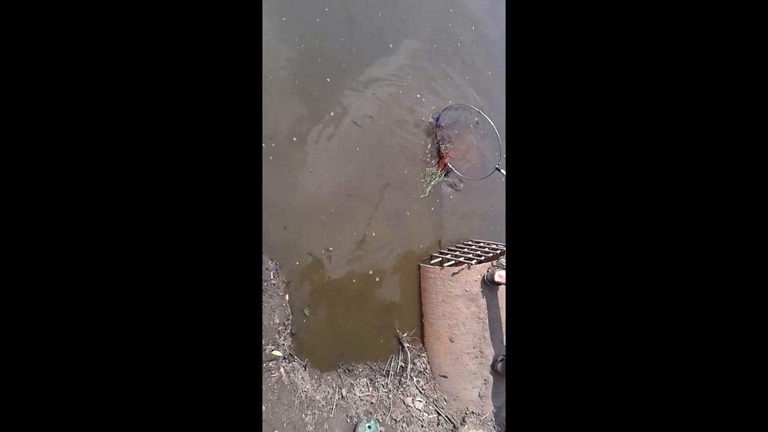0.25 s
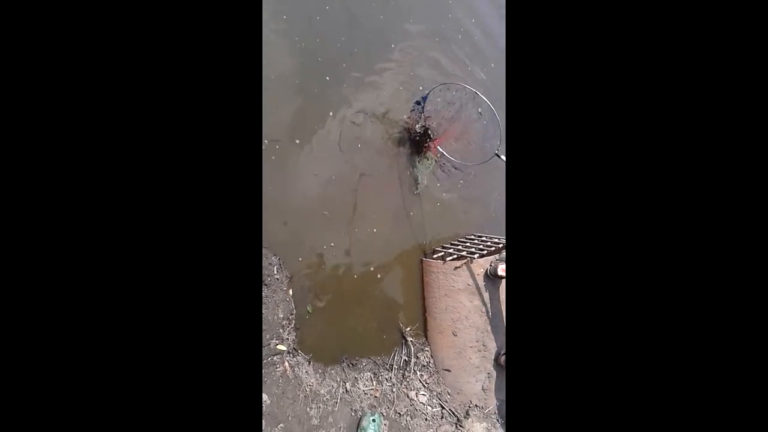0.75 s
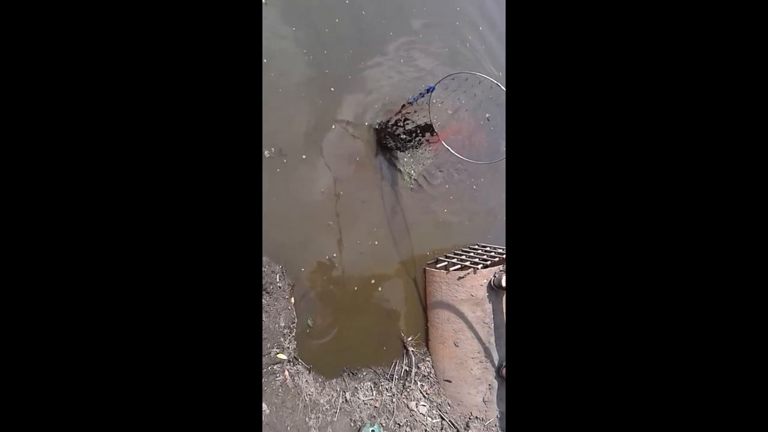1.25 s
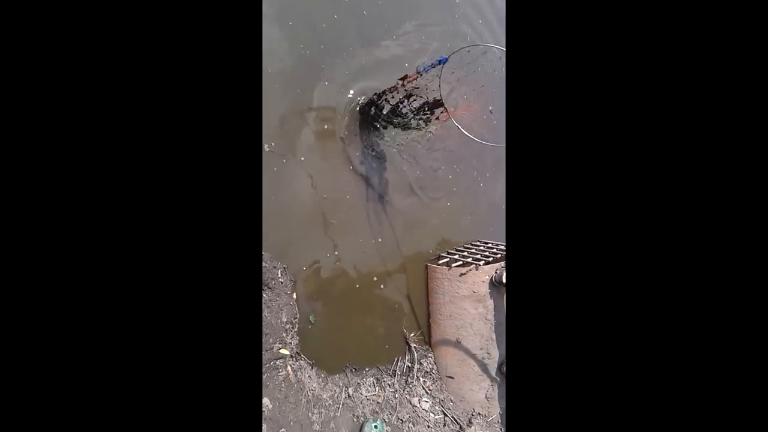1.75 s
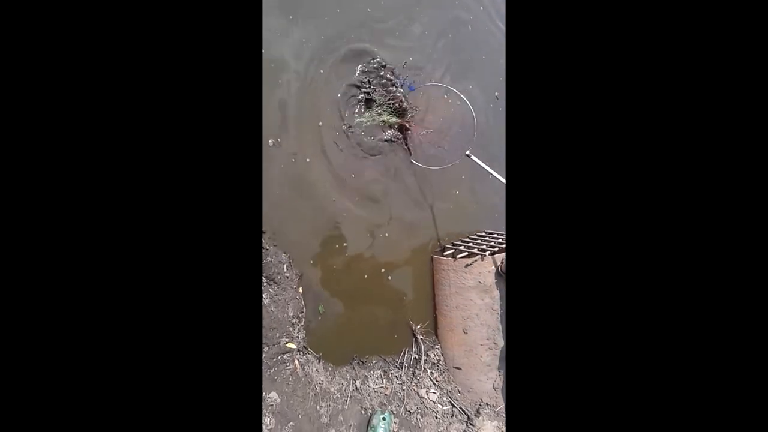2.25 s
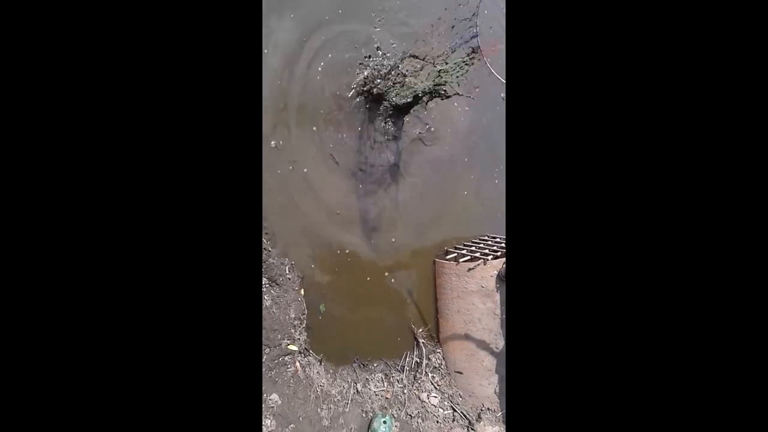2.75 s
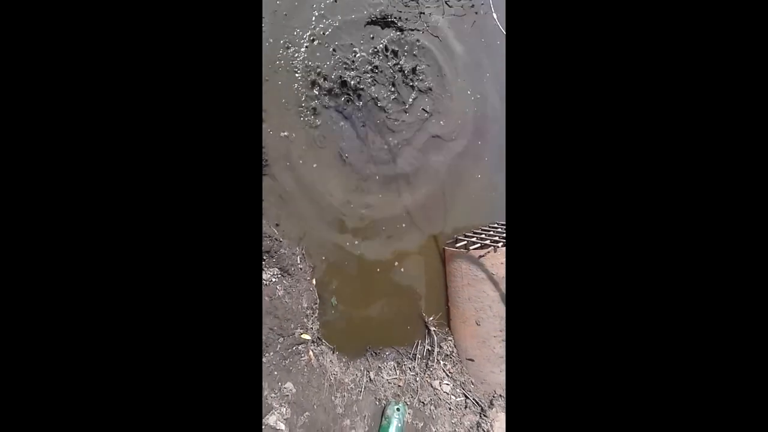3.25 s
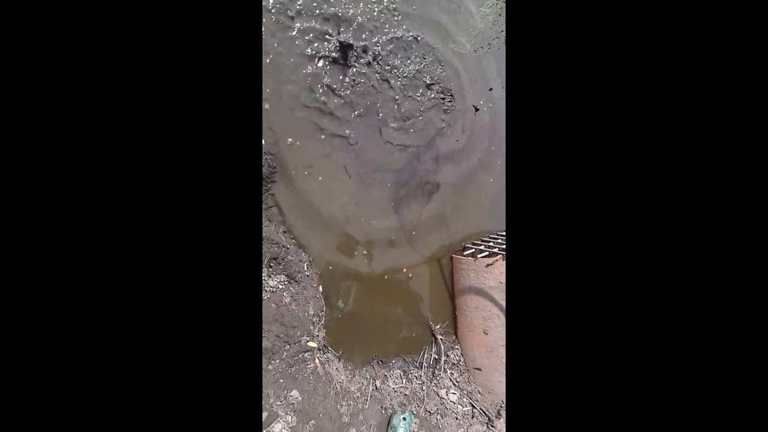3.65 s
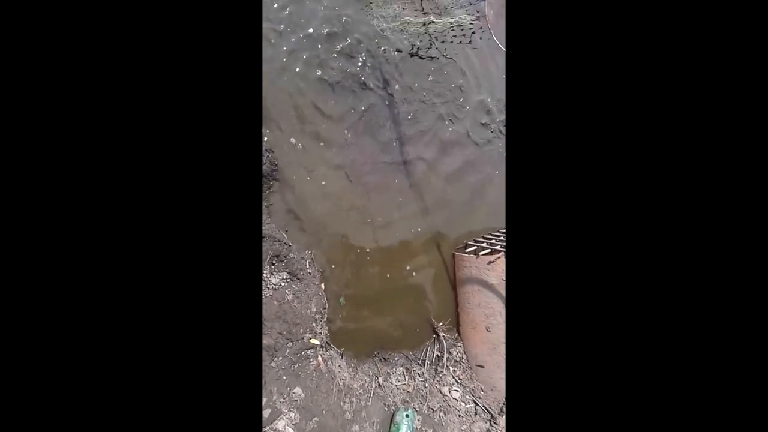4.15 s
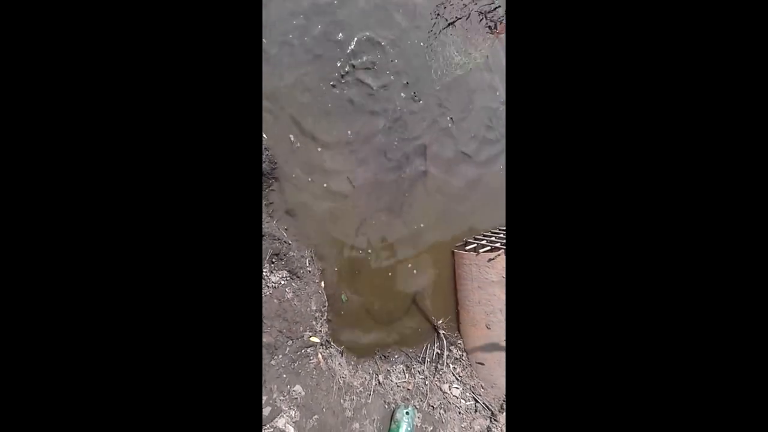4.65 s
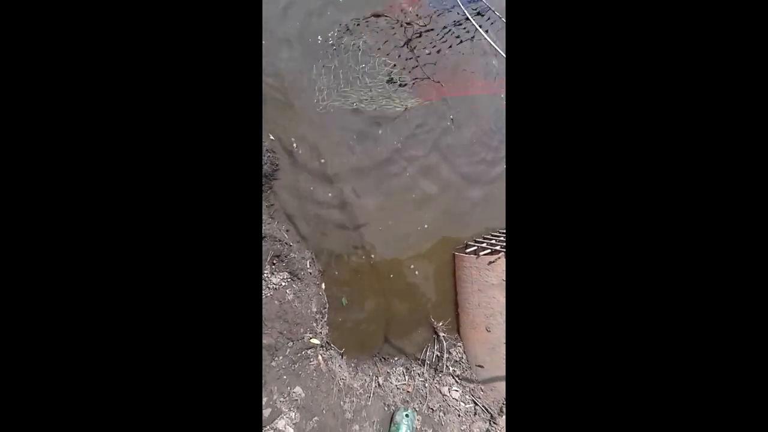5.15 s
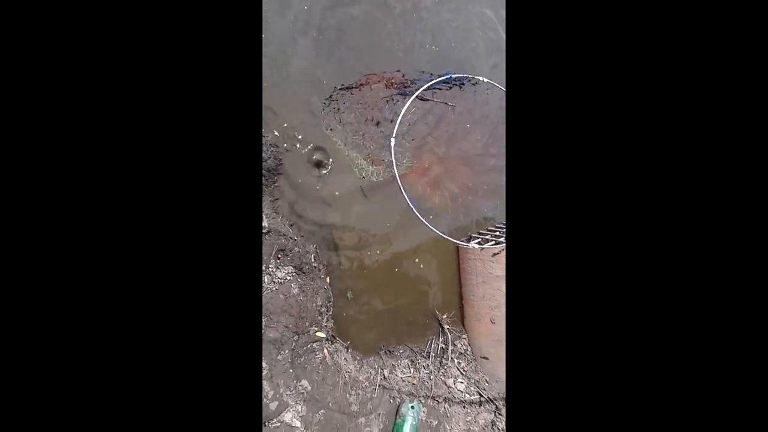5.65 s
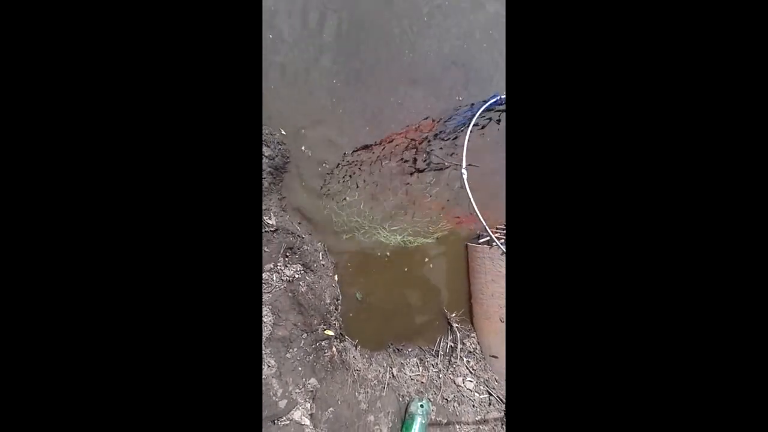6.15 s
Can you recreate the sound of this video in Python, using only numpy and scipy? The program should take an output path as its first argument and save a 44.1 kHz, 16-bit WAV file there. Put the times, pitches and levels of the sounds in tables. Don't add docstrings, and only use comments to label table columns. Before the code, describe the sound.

A net works through shallow water: near silence, a sudden cluster of hard wet clicks and sloshes, draining patter, then a second dunk with small bubbles and gulps. The splashing thins to stray drops. Later a few sharper ticks and gritty wet rustles come from the muddy bank, while soft wind buffets the microphone. Very faint cricket trill and outdoor hiss lie underneath; close, dry phone sound.

```python
import sys
import numpy as np
from scipy import signal
from scipy.fft import rfft, irfft, next_fast_len
from scipy.io import wavfile
from scipy.ndimage import uniform_filter1d, map_coordinates

SR = 44100
rng = np.random.default_rng(int(sys.argv[2]) if len(sys.argv) > 2 else 0)


def int16_out(signal):
    q = np.round(np.clip(np.atleast_2d(signal).T, -1, 1) * 32767)
    wavfile.write(sys.argv[1], SR, q.astype(np.int16))


def nominal_scale(level):
    x = np.asarray(level, float) / 20
    return 10 ** x


N = 282240
TIME_S = np.arange(N) / SR

# (frequency [Hz], density [dB per Hz])
HISS_SPECTRUM = [(59, -20.5), (100, -10.5), (129, -5.5), (374, -4), (546, -4.5), (679, -6), (1130, -8.5),
                 (3270, -14), (4770, -15.5), (7500, -15.5), (9750, -42), (16500, -120)]
# (time [s], level [dB])
WIND = [
    (0.0, -85),
    (1.4, -86),
    (2.0, -78),
    (3.0, -77.5),
    (3.08, -66.5),
    (3.35, -62),
    (3.5, -71.5),
    (5.5, -73),
    (6.02, -59),
    (6.4, -58),
]
# (frequency [Hz], density [dB per Hz])
BUFFET_SPECTRUM = [(12, -42.5), (20, -13.5), (76, 0), (111, -7), (216, -14.5), (250, -18.5), (320, -47),
                   (550, -120)]
# (time [s], peak [dB], frequency [Hz])
KNOCKS = [(2.175, -58, 62), (2.577, -60, 100), (3.165, -57.5, 78.1), (3.528, -67, 152), (3.885, -50, 69.6),
          (4.158, -53.5, 104), (4.574, -59, 68.6), (5.077, -53.5, 129), (5.323, -53, 46.3),
          (5.373, -54.5, 59.2), (5.887, -55, 89.5), (5.982, -54.5, 102)]
# (start [s], end [s])
CRICKET_RESTS = [(.46, 0.57), (2.33, 3.08), (4.22, 4.38), (6.13, 6.27)]

# (time [s], stirring [dB], churn depth [dB])
HAUL = [
    (0.85, -68, -8),
    (1.1, -64, -7),
    (1.14, -54, -6.5),
    (1.27, -48, -5.5),
    (1.33, -46, -2),
    (1.39, -47.5, -2),
    (1.53, -50, -10),
    (1.85, -49.5, -12.5),
    (2.02, -51, -6),
]
# (time [s], stirring [dB], churn depth [dB])
SHAKE = [
    (2.22, -50, -12),
    (2.35, -53, -12),
    (2.47, -54, -9),
    (2.73, -53, -4),
    (2.89, -54.5, -7.5),
    (3.1, -62, -8),
]
# (time [s], depth [dB])
LULLS = [(1.54, 7), (2.036, 6), (2.145, 10), (2.268, 12), (2.39, 12), (2.445, 7), (2.853, 25), (2.978, 24),
         (2.338, 7), (3.044, 21)]
# (frequency [Hz], density [dB per Hz])
SHEET_SPECTRUM = [(700, -46), (1500, -11.5), (2500, 0.5), (5500, -7), (7500, 0), (9000, -62)]

# (time [s], peak [dB], pitch [Hz], length [ms])
LIFT_SLAPS = [(0.933, -35, 4090, 3.8), (1.05, -28, 4990, 1.18), (1.086, -35, 5180, 1.5),
              (1.113, -42, 4500, 2.1), (1.1495, -29, 1890, 2), (1.1768, -6.5, 5110, 0.29),
              (1.201, -31, 5020, 11), (1.233, -27.5, 2390, 3.8), (1.2448, -21, 5907, 1.7),
              (1.2556, -24, 4490, 1.9), (1.293, -23.5, 4990, 2.44), (1.312, -28.5, 5140, 9.3),
              (1.3296, -26.5, 5450, 1.8), (1.366, -36, 4440, 2.7), (1.4153, -22, 5050, 3.2),
              (1.4255, -21, 2133, 2.36), (1.44, -24.5, 3586, 6.2), (1.468, -34.5, 5980, 2.44),
              (1.498, -28.5, 2895, 2.88), (1.569, -31, 4030, 2.4), (1.584, -29.5, 5530, 2.33),
              (1.638, -43, 5250, 3), (1.7032, -34.5, 4390, 3.9), (1.843, -30, 5010, 2.88),
              (1.8765, -32, 1904, 2.8), (1.8952, -29.5, 3070, 4.3), (1.9484, -43, 5060, 3.1),
              (1.977, -38, 5900, 1.4), (2.0006, -35, 5750, 2), (2.0282, -29, 6030, 1.5)]
# (time [s], peak [dB], pitch [Hz], length [ms])
DUNK_SLAPS = [(2.0671, -23, 2100, 2.04), (2.077, -33, 4800, 2.3), (2.09, -32, 2150, 2.8),
              (2.097, -29.5, 4104, 4.6), (2.105, -16, 5544, 1.7), (2.114, -23.5, 3750, 3.5),
              (2.1295, -21.5, 1645, 1.93), (2.157, -32.5, 1885, 2.9), (2.174, -36, 5100, 2.6),
              (2.183, -33, 5350, 1.5), (2.208, -22.5, 1907, 2.87), (2.224, -17, 3275, 2.7),
              (2.2853, -38, 4550, 2.9), (2.298, -25.5, 4590, 3.16), (2.312, -29, 4660, 2.01),
              (2.3183, -27.5, 5150, 1.83), (2.362, -25, 5240, 1.7), (2.3654, -20.5, 5600, 1.4),
              (2.411, -33, 4590, 1.8), (2.428, -39, 2980, 2)]
# (time [s], peak [dB], pitch [Hz], length [ms])
EMPTYING_SLAPS = [(2.488, -30.5, 2020, 2.6), (2.5243, -27, 6140, 1.2), (2.5454, -31, 6050, 1.5),
                  (2.5576, -23.5, 5910, 3.1), (2.5624, -23.5, 5500, 3.2), (2.571, -24, 5450, 4.3),
                  (2.5882, -29, 5960, 1.8), (2.6012, -28, 4370, 5.2), (2.609, -29, 5680, 4.8),
                  (2.6212, -33.5, 3310, 2.4), (2.638, -37, 5200, 1.9), (2.6455, -23.5, 4570, 2.18),
                  (2.6763, -32.5, 5560, 1.4), (2.718, -32, 3260, 2), (2.7275, -31, 2005, 1.4),
                  (2.799, -32.5, 3200, 3.9), (2.834, -34.5, 2870, 3.6), (2.8675, -37, 5460, 3),
                  (2.888, -24, 2473, 2.9), (2.932, -35, 5070, 1.5), (2.9434, -29, 1970, 1.3),
                  (2.969, -33, 6030, 1.4), (3.0008, -32, 3360, 2.3), (3.007, -34, 4980, 3),
                  (3.031, -26, 5710, 1.6), (3.049, -43, 4340, 2.5), (3.1596, -27.5, 3165, 1.57),
                  (3.1644, -30, 3017, 2.1)]
# (time [s], peak [dB], pitch [Hz], length [ms])
DRIPS = [(0.14, -41.5, 6290, 3.4), (0.5353, -39.5, 1447, 5), (0.586, -41, 4270, 1.84),
         (0.721, -43.5, 4450, 2.16), (3.397, -37.5, 5250, 1.72), (3.424, -41, 5040, 2.1),
         (3.442, -37, 4690, 2), (3.48, -35.5, 6030, 2.6), (3.6266, -44, 4960, 2.24),
         (3.7508, -42, 3440, 2.5), (3.981, -37.5, 5230, 2.49), (3.981, -38, 2193, 2.96),
         (4.6803, -41, 3980, 3), (4.7354, -27.5, 5810, 0.64), (4.85, -34.5, 3240, 2.2),
         (4.856, -36, 1610, 3.8), (4.8644, -35, 4820, 2.6), (5, -34.5, 4600, .7), (5.066, -36, 6840, 4.7),
         (5.0985, -38.5, 4900, 4.8), (5.124, -38, 5100, 2.44), (5.1593, -30, 1503, 2),
         (5.32, -39.5, 4940, 2.5), (5.4099, -19.5, 4465, 2.27), (5.442, -34, 5380, 2.4),
         (5.461, -37, 4500, 3.1), (5.4688, -35, 5580, 1.7), (5.5707, -42, 4340, 1.7),
         (5.732, -25, 5800, 2.4), (6.2632, -43, 5320, 2.9)]

# (time [s], peak [dB], pitch [Hz], t60 [s])
BUBBLES = [(0.535, -42.5, 504, 0.037), (1.017, -37, 945, 0.012), (1.176, -27, 601, 0.024),
           (1.199, -40, 1350, 0.04), (1.253, -32, 1150, 0.018), (1.278, -34, 1480, 0.022),
           (1.286, -35, 1370, 0.018), (1.296, -37, 564, 0.04), (1.329, -30, 1084, 0.033),
           (1.395, -31, 2020, 0.014), (1.412, -31.5, 1090, 0.034), (1.434, -31.5, 1347, 0.033),
           (1.483, -34, 707, 0.025), (1.581, -35, 876, 0.015), (1.766, -45, 1860, 0.044),
           (1.842, -39.5, 1230, 0.041), (1.954, -35, 1297, 0.027), (1.994, -35.5, 1480, 0.018),
           (2.088, -38, 1256, 0.039), (2.156, -39, 2080, 0.042), (2.22, -31, 1370, 0.033),
           (2.531, -35.5, 1650, 0.025), (2.557, -24.5, 1520, 0.013), (2.649, -41.5, 1400, 0.033),
           (2.683, -41, 2170, 0.034), (2.714, -38.5, 1000, 0.075), (2.886, -21.5, 1206, 0.0088),
           (2.915, -33, 1490, 0.021), (2.941, -37, 1935, 0.031), (5.157, -34, 710, 0.029)]
# (time [s], peak [dB], pitch [Hz], t60 [s])
SAGGING_DRIP = (4.9995, -36.5, 690, .085)
# (time [s], length [s], level [dB], start pitch [Hz], end pitch [Hz])
GULPS = [(1.1749, 0.0079, -33, 1750, 2150), (1.1761, 0.0023, -20.5, 3060, 3370),
         (1.336, 0.017, -35.5, 1133, 1420), (1.519, 0.023, -48, 1080, 1030),
         (2.485, 0.01, -38.5, 1860, 3960), (2.558, 0.048, -44.5, 630, 745), (2.57, 0.045, -50, 840, 1212),
         (2.713, .056, -34.5, 511, 1400), (2.726, 0.0095, -38, 1060, 1340), (2.788, 0.023, -54, 1520, 2400),
         (6.198, 0.0255, -51, 704, 924)]

# (time [s], peak [dB], pitch [Hz], length [ms])
LIFT_BEADS = [(1.1364, -45, 5300, 4.5), (1.1419, -43, 4480.0, 6), (1.2004, -35.5, 1870, 6.2),
              (1.264, -36, 5230, 5.7), (1.2781, -42, 5770.0, 7.6), (1.2957, -35, 1790, 12),
              (1.318, -34, 2990, 6.4), (1.3345, -38, 4480.0, 7.7), (1.3425, -27.5, 1225, 6.1),
              (1.4469, -46, 858, 19), (1.4722, -45.5, 1120.0, 13), (1.4776, -39, 3080, 9.2),
              (1.4913, -40, 3080, 4.4), (1.526, -46, 1135, 9.2), (1.5846, -39.5, 3054, 4.7),
              (1.5975, -45, 2580.0, 6.1), (1.6562, -45, 4820.0, 9.2), (1.7371, -42, 4940, 7),
              (1.788, -39, 5700, 4.1), (1.8268, -44, 4500, 5.4), (1.842, -44, 3130, 7.2),
              (1.9224, -42, 2070, 7.6), (1.9266, -41, 5590, 6.1), (1.9286, -44, 4480.0, 4.5),
              (1.9466, -41, 5200, 4.9), (1.973, -41, 4220.0, 4.5), (1.981, -41, 1720.0, 5.9),
              (2.0808, -41, 1810.0, 5.5), (2.09, -36, 2160, 4.9)]
# (time [s], peak [dB], pitch [Hz], length
# [ms])
SHAKE_BEADS = [(2.1292, -33, 3630, 6.7), (2.1561, -41, 5940.0, 5.0), (2.2244, -23, 6270, 4.1),
               (2.2394, -45, 5170.0, 9.2), (2.2798, -41, 3070, 7.7), (2.2853, -37, 6030.0, 4.8),
               (2.3247, -42, 3220, 5.5), (2.3407, -41, 5270, 8.5), (2.405, -43, 6120.0, 5.8),
               (2.4759, -45, 3880, 4.9), (2.5367, -36, 6000, 4.7), (2.5397, -43, 3670, 6.7),
               (2.5722, -27.5, 2020, 4.6), (2.5761, -33, 6120.0, 3.8), (2.6051, -43, 2720, 6.7),
               (2.6161, -36, 4650.0, 4.7), (2.622, -45, 2240.0, 6.0), (2.6879, -42, 5680.0, 7.3),
               (2.7054, -40, 1890.0, 5.5), (2.7453, -44, 2100, 5.5), (2.8021, -42.5, 2140, 7.1),
               (2.876, -43, 5770.0, 5.5), (2.9204, -46, 4300, 3.9), (2.9433, -39, 5600.0, 3.6),
               (3.0012, -39, 4650.0, 4.0), (5.1598, -38, 3910, 10.7), (5.1598, -34.5, 5160, 6.3),
               (5.4132, -32, 2600, 5.3), (5.4137, -34, 6200.0, 9.3), (5.4636, -42, 3020, 6.3),
               (5.4761, -45, 4370, 5.0)]
# (time [s], peak [dB], pitch [Hz], length [ms])
SLAP_BEADS = [(1.0506, -36.5, 2090, 3.9), (1.2038, -48, 1320, 11.0), (1.2561, -42, 2910, 6.7),
              (1.2741, -41, 3330, 5.8), (1.305, -40, 1354, 28), (1.3117, -37, 5300, 4.5),
              (1.3355, -39, 6520, 12), (1.3434, -36, 5250, 5.5), (1.3664, -37, 6120, 4.5),
              (1.3784, -41, 6200, 5.0), (1.3799, -39, 3790, 4.5), (1.4332, -42, 806, 19),
              (1.4397, -31.5, 3530, 5.5), (1.5824, -38, 4300, 5.7), (1.639, -32, 5360, 4.2),
              (1.8029, -51, 1680, 22), (1.99, -45, 3520, 4.6), (2.0985, -26.5, 4220, 4),
              (2.1835, -37, 5360, 4.8), (2.2103, -35, 3200, 5.6), (2.2249, -33, 3270, 4.1),
              (2.5245, -28, 5990, 4.0), (2.5472, -31, 5940, 3.6), (2.5801, -43.5, 895, 14),
              (2.5891, -40, 3060, 4.5), (2.639, -35, 5440, 4.5), (2.6545, -46, 5850, 7.5),
              (2.889, -37, 5350, 6.5), (4.8395, -46, 3200, 4.4), (5.4107, -31, 5170, 7.2),
              (5.432, -47, 1160, 6), (5.4686, -44.5, 860, 9.3)]
# (time [s], peak [dB], pitch [Hz], length [ms])
CALM_BEADS = [(.885, -48, 2310, 4.8), (.932, -42, 2540, 3.8), (0.9563, -44, 6000, 3.8),
              (1.069, -43, 5800, 3.8), (1.1125, -42, 2650, 4), (3.111, -47, 5450, 4.4),
              (3.277, -46, 5360, 3.8), (3.442, -34, 4805, 4.4)]
# (time [s], peak [dB], pitch [Hz], length [ms])
LATE_BEADS = [(2.866, -47, 1700, 8), (2.9195, -41, 3300, 4), (3.011, -47.5, 2180, 7.9),
              (3.0333, -34, 4510, 4.5), (3.05, -47, 4020, 6.5), (5.181, -51, 1010, 5.4),
              (5.351, -46, 6300, 3.5), (5.38, -44, 5600, 4), (5.409, -33, 2160, 4.4)]

# (time [s], length [s], level [dB], low part relative [dB])
CRUNCHES = [(1.125, 0.025, -47, -13), (1.177, 0.024, -35, -34), (2.564, 0.039, -36.5, -18),
            (4.764, 0.082, -56, -15), (4.86, 0.072, -49.5, -2.5), (4.956, 0.059, -58.5, -0.5),
            (5.105, 0.034, -48, -8.5), (5.1553, 0.011, -33.5, -2.5), (5.2, 0.022, -60, -1),
            (5.274, 0.036, -51, -7), (5.4094, 0.022, -34, -5), (5.439, 0.007, -55.5, 6.5),
            (5.464, 0.037, -45, -4.5), (5.52, 0.035, -49.5, -9), (5.572, 0.032, -51, -8),
            (5.731, 0.015, -43.5, -22)]

# (frequency [Hz], gain [dB])
MIC_RESPONSE = [(20, -2), (3000, -2), (6200, 0), (7000, -6.5), (7600, -17), (7900, -20.5), (8200, -99)]
# (frequency [Hz], gain [dB])
MIRROR_RESPONSE = [(7900, -78.5), (8100, 5.5), (9000, -8.5), (10000, -30), (10500, -50.5), (11000, -84)]
# (start [s], end [s])
BASS_GAPS = [(1.225, 1.24), (1.385, 1.485), (1.57, 1.6), (2.225, 2.325)]
# (start [s], end [s])
EDGE_GAPS = [(0, .2), (.48, .65), (1.22, 1.64), (2.59, 2.7), (3.65, 3.78), (4.9, 5.05), (5.6, 5.6),
             (6.1, 6.35)]
# (start [s], end [s])
MID_GAPS = [(2.848, 2.859)]


def unit(x):
    return x / np.sqrt(np.mean(x ** 2) + 1e-20)


def curve(rows, column, outside_db=-120):
    rows = np.array(rows)
    return np.interp(TIME_S, rows[:, 0], rows[:, column], outside_db, outside_db)


def wobble(rate_hz):
    knots = rng.standard_normal(int(N * rate_hz / SR) + 4)
    return map_coordinates(knots, [TIME_S * rate_hz])


def coloured(x, points):
    size = next_fast_len(N + 8192)
    hz, db = np.transpose(points)
    bins_hz = np.fft.rfftfreq(size, 1 / SR)
    gain = nominal_scale(np.interp(np.log(bins_hz + 1), np.log(hz), db))
    return irfft(rfft(x, size) * gain, size)[..., :N]


def band(x, lo_hz, hi_hz):
    sos = signal.butter(2, [lo_hz, min(hi_hz, SR * 0.45)], "bandpass", fs=SR, output="sos")
    return signal.sosfilt(sos, x)


def tone(pitch_hz):
    return np.sin(2 * np.pi * np.cumsum(pitch_hz) / SR)


def add(out, start_s, sound):
    part = out[round(start_s * SR):][:len(sound)]
    part += sound[:len(part)]


def hiss():
    level_db = -57.5 + 0.11 * wobble(2.4)
    return nominal_scale(level_db) * unit(coloured(rng.standard_normal(N), HISS_SPECTRUM))


def wind():
    gust_db, gust_s, gust_lag_s = -8, 0.043, 0.02
    strength = nominal_scale(curve(WIND, 1))
    for s, db, hz in KNOCKS:
        strength += nominal_scale(db + gust_db) * np.exp(-((TIME_S - s - gust_lag_s) / gust_s) ** 2)
    rumble = coloured(rng.standard_normal(N), BUFFET_SPECTRUM)
    out = strength * unit(nominal_scale(2.9 * wobble(14)) * rumble)
    t = np.arange(SR // 12) / SR
    for s, db, hz in KNOCKS:
        shape = np.exp(-t * hz * 0.7) * (1 - np.exp(-t / 0.004))
        add(out, s, -nominal_scale(db + 3.0) * np.sin(2 * np.pi * hz * t) * shape)
    return out


def cricket():
    singing = 1.0 - sum((TIME_S > a) * (TIME_S < b) for a, b in CRICKET_RESTS)
    trill = tone(4725 + 7 * wobble(15)) * nominal_scale(wobble(90))
    return nominal_scale(-73) * uniform_filter1d(singing, 900) * unit(trill)


def stirring_db():
    lulls_db = sum(db * np.exp(-((TIME_S - s) / 0.012) ** 2) for s, db in LULLS)
    return curve(HAUL + SHAKE, 1) - lulls_db


def grains(level_db, count, mid_hz, spread, cycles, scatter_db, rise):
    draw, t = rng.random((count, 4)), np.arange(640) / SR
    chance = np.cumsum(nominal_scale(level_db) ** 0.5)
    start = np.searchsorted(chance, draw[:, 0] * chance[-1])
    hz = mid_hz * np.exp(spread * (draw[:, 1:2] + draw[:, 2:3] - 1))
    hz = np.clip(hz, 300, 7600)
    age = t * hz / cycles
    size = nominal_scale(-scatter_db * np.log(draw[:, 3:] + 0.0025))
    shape = np.exp(-age) * (1 - np.exp(-4 * age))
    rows = size * np.sin(2 * np.pi * hz * t * (1 + rise * age / 2)) * shape
    places = start[:, None] + np.arange(len(t))
    x = np.bincount(places.ravel(), rows.ravel(), N + len(t))[:N]
    local_rms = np.sqrt(np.abs(uniform_filter1d(x * x, SR // 6)) + 1e-6)
    return nominal_scale(level_db) * x / local_rms


def patter():
    stir_db = stirring_db()
    ticks = grains(stir_db - 10.0, count=330, mid_hz=4530, spread=0.54, cycles=6.0, scatter_db=4.0, rise=0.34)
    blips = grains(stir_db - 15.0, count=120, mid_hz=2100, spread=0.705, cycles=7, scatter_db=4, rise=0.12)
    strays = grains(np.full(N, -73.0), count=70, mid_hz=4320, spread=0.6, cycles=4, scatter_db=-1.0, rise=0.18)
    return ticks + blips + strays


def slap(t, db, hz, ms, low_db):
    climb, noise = rng.standard_normal(), rng.standard_normal(len(t))
    life_s = np.clip(ms, 0.6, 9) / 1000
    shape = np.exp(np.where(t < 0, t / (0.35 * life_s), -t / (0.92 * life_s)))
    burst = noise * shape
    octaves = 0.252 * np.tanh(abs(climb)) * (t / life_s - 0.3)
    droplet = shape * tone(np.minimum(hz * 2 ** octaves, 7500))
    click = 4 * np.sign(climb) * (np.abs(t) < 0.6 / SR) * 0.0011 / life_s
    narrow = band(burst, hz * 0.84, hz * 1.24)
    broad = band(band(burst + click, hz * 0.33, hz * 2.67), hz * 0.5, 8000)
    high = 0.36 * droplet + 0.74 * narrow + 0.5 * broad
    low = band(band(burst, 530, 2220), 260, 1700)
    return nominal_scale(db) * (high / np.abs(high).max() + nominal_scale(low_db - 3.5) * low / np.abs(low).max())


def splashes():
    out, t = np.zeros(N), np.arange(SR // 20) / SR - 0.006
    depth_db = curve(HAUL + SHAKE, 2, outside_db=-15)
    for s, db, hz, ms in LIFT_SLAPS + DUNK_SLAPS + EMPTYING_SLAPS:
        push_db = -1.5 + 1.9 * depth_db[round(s * SR)]
        add(out, s + t[0], slap(t, db, hz, ms, push_db))
    for s, db, hz, ms in DRIPS:
        add(out, s + t[0], slap(t, db, hz, ms, low_db=-14))
    return out


def ring(db, hz, t60_s, rise):
    t = np.arange(SR // 6) / SR
    t60_s = np.clip(t60_s, 0.01, 0.16)
    pitch_hz = hz * 2 ** (rise * (1 - np.exp(-3 * t / t60_s)))
    return nominal_scale(db - 60 * t / t60_s) * (1 - np.exp(-t / 0.00097)) * tone(pitch_hz)


def gulp(length_s, db, start_hz, end_hz):
    u = np.linspace(0, 1, round(length_s * SR))
    late = 2.6 if start_hz < 680 else 1
    ratio = end_hz / start_hz
    pitch_hz = start_hz * ratio ** np.sin(np.pi / 2 * u ** late) ** 2
    level_db = db + 11.2 * np.log2(ratio) * (u - 1.0)
    return nominal_scale(level_db) * np.sin(np.pi * u) ** 0.2 * tone(pitch_hz)


def bubbles():
    out = np.zeros(N)
    for s, db, hz, t60_s in BUBBLES:
        add(out, s, ring(db + 3.0, hz * 0.946, t60_s, rise=0.2))
    add(out, SAGGING_DRIP[0], ring(*SAGGING_DRIP[1:], rise=-0.3))
    for s, *settings in GULPS:
        add(out, s, gulp(*settings))
    return out


def stirred_water():
    spray_db, depth_db = stirring_db(), curve(HAUL + SHAKE, 2, outside_db=0)
    surge_db = 1.4 * wobble(35)
    sheet_db = spray_db - 4.5 + surge_db + 4.7 * wobble(180)
    sheet = nominal_scale(sheet_db) * unit(coloured(rng.standard_normal(N), SHEET_SPECTRUM))
    fizz = grains(spray_db - 3.0 + surge_db, count=5000, mid_hz=4910, spread=0.92,
                  cycles=4.2, scatter_db=4.0, rise=0.25)
    gurgle = grains(spray_db + depth_db + surge_db, count=2500, mid_hz=1405, spread=0.677,
                    cycles=3.9, scatter_db=5.5, rise=0.32)
    return sheet + fizz + gurgle


def beads():
    out, t = np.zeros(N), np.arange(SR // 25) / SR - 0.008
    for s, db, hz, ms in LIFT_BEADS + SHAKE_BEADS + SLAP_BEADS + CALM_BEADS + LATE_BEADS:
        life_s = max(ms - 2.5, 1) / 1000
        shape = np.exp(np.where(t < 0, -(t / (0.37 * life_s)) ** 2, -t / (0.45 * life_s)))
        pitch_hz = np.minimum(hz * 2 ** (0.1456 * np.tanh(t / life_s)), 7500)
        add(out, s + t[0], nominal_scale(db + 2) * shape * tone(pitch_hz))
    return out


def crunches():
    crackle = rng.standard_normal((2, N)) * nominal_scale(4 * wobble(600))
    high = unit(band(crackle[0], 2040, 8100))
    low = unit(band(crackle[1], 388, 1530))
    out = np.zeros(N)
    for s, length_s, db, low_db in CRUNCHES:
        age = (TIME_S - s) / length_s
        if length_s < 0.012:
            shape = (age > 0) * np.exp(-age ** 2)
        else:
            shape = np.exp(-(2 * age) ** 2)
        out += nominal_scale(db) * shape * (high + nominal_scale(low_db) * low)
    return out


def scene():
    water = stirred_water() + splashes() + crunches() + bubbles() + beads()
    water = band(water, 150, 18000)
    t = np.arange(SR // 8) / SR
    bank = nominal_scale(-60 * t / 0.17) * rng.standard_normal(len(t))
    echo = signal.fftconvolve(band(water, 900, 9000), bank / np.linalg.norm(bank))[:N]
    outdoors = hiss() + wind() + cricket()
    return (water + nominal_scale(-12.0) * echo + outdoors + patter())[None]


def starved(x, gaps, lo_hz, hi_hz):
    part = coloured(x, [(lo_hz * 0.98, -120), (lo_hz, 0), (hi_hz, 0), (hi_hz / 0.98, -120)])
    gate = sum((TIME_S >= a) * (TIME_S < b) * 1.0 for a, b in gaps)
    return x - part * uniform_filter1d(gate, 250)


def roll_off(x):
    return signal.sosfilt(signal.butter(12, 10540, fs=SR, output="sos"), x)


def record(dry):
    phone_rate_hz = 16000
    kept = coloured(dry, MIC_RESPONSE)
    mirror = coloured(kept * np.cos(2 * np.pi * phone_rate_hz * TIME_S), MIRROR_RESPONSE)
    heard = kept + mirror + nominal_scale(-94.5) * rng.standard_normal(N)
    heard = starved(heard, BASS_GAPS, 1, 110)
    heard = starved(heard, MID_GAPS, 2800, 5200)
    heard = starved(heard, EDGE_GAPS, 7650, 8400)
    return roll_off(heard)


dry = scene()
out = record(dry)
int16_out(out)
```